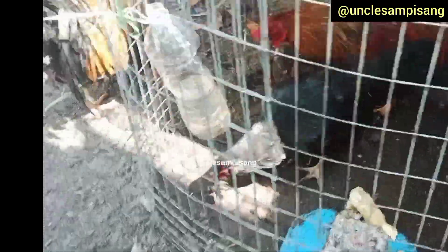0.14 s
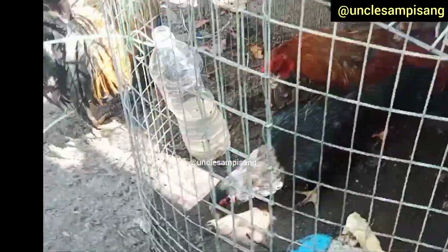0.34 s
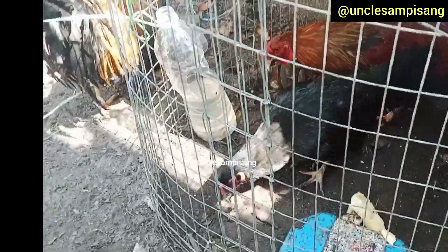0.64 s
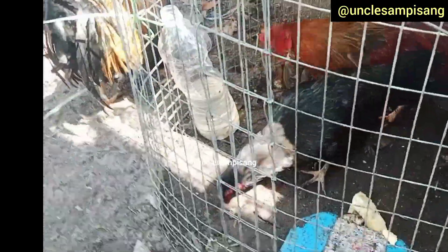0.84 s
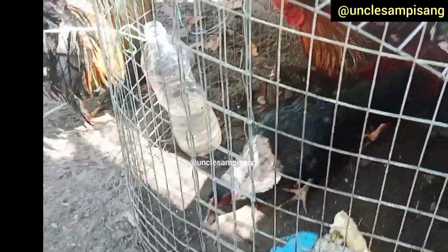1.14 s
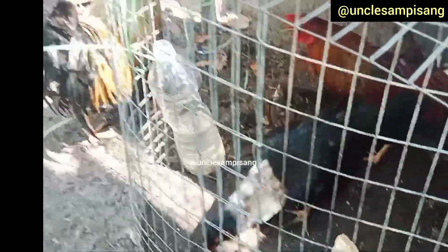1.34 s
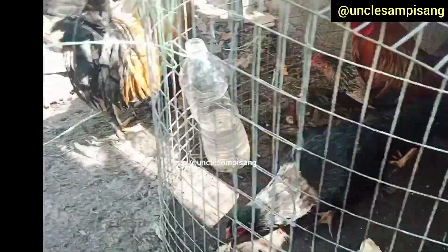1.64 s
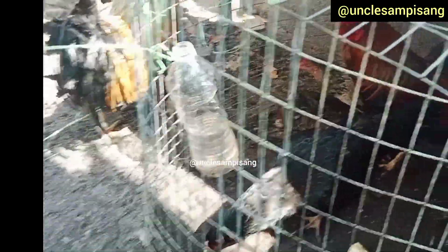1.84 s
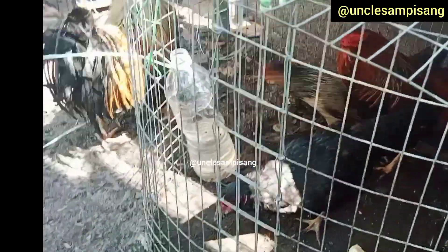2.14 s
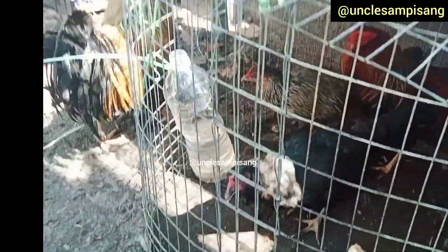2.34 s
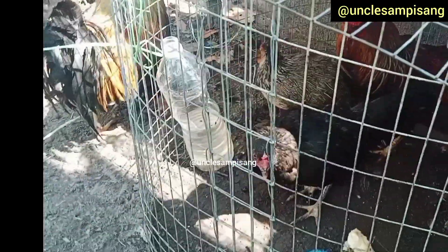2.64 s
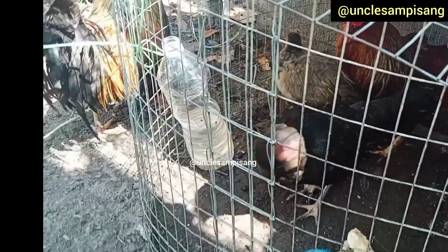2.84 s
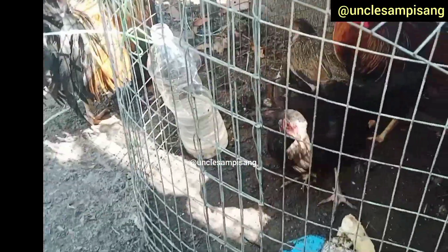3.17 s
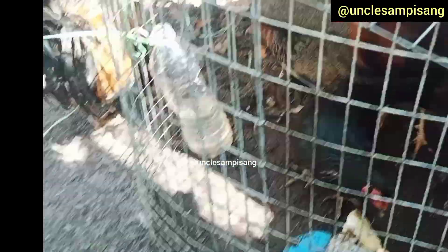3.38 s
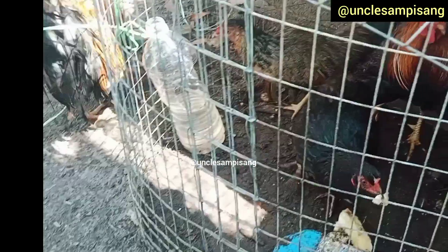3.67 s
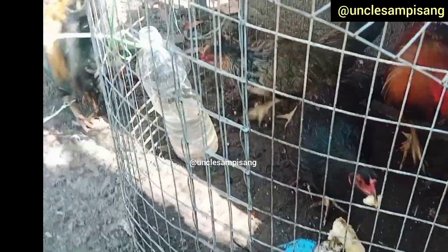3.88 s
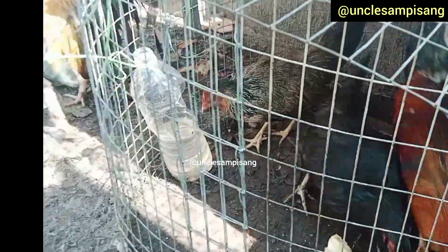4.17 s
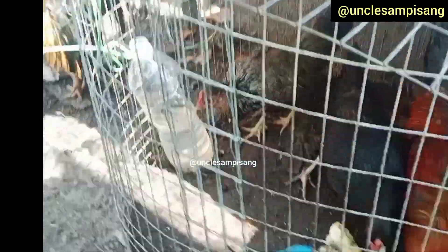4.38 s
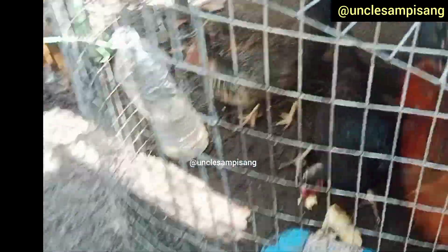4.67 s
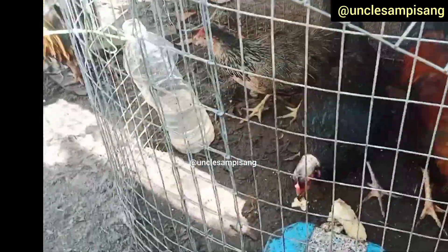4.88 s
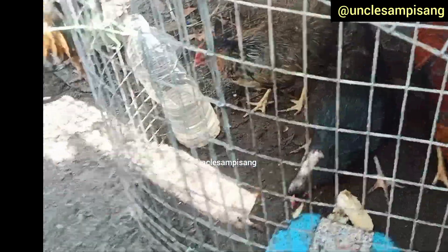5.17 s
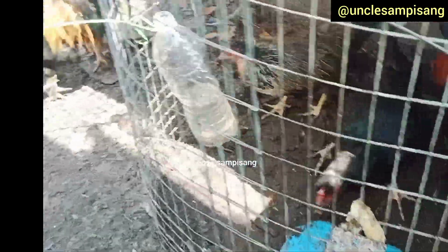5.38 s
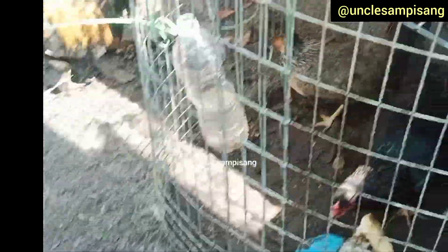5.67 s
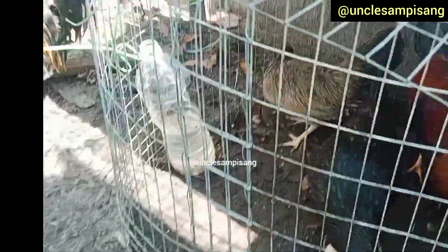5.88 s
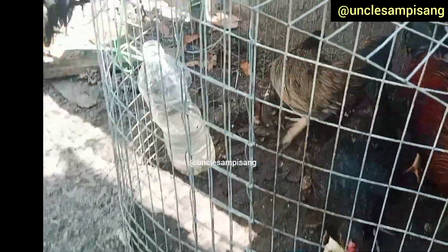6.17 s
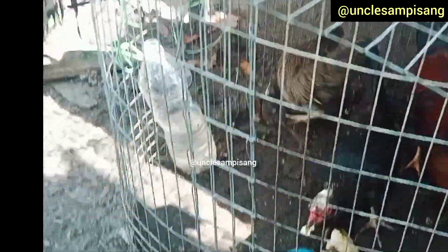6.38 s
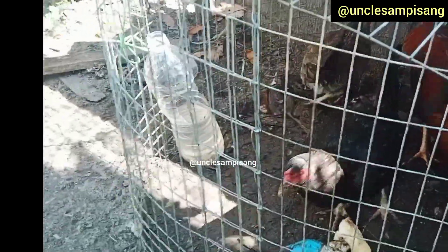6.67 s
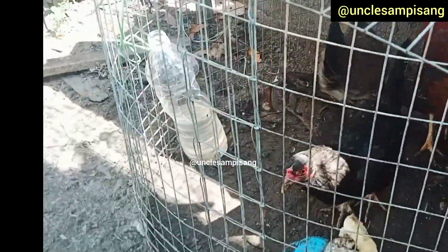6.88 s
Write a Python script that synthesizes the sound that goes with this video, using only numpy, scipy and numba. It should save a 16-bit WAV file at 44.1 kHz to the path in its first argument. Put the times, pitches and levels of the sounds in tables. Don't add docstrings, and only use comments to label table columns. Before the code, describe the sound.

In an outdoor wire pen, a rooster about a metre from a phone microphone gives short hoarse food clucks, each around a twentieth of a second, starting with a tiny closed hum and opening into a nasal, raspy burst pitched near 500 Hz. Three clucks come at 0.1 to 0.45 s, then a gap until 1.1 s. A run of about six per second follows, stronger from 2.1 s, fading to weak clucks at 3.2 and 3.4 s. After a pause, a second run starts at 3.9 s, slightly higher, louder from 5.4 s, and continues to the end at 7 s. Underneath are faint hen coos, a small knock with a murmur near 3.1 s, a crisp wire tick at 5.1 s, thin distant wheezes and barely audible leaf rustle. At 6.9 s a chick peeps sharply while feet scratch litter. Short yard echo, very low hush.

```python
import sys
import numpy as np
from scipy import signal
from scipy.fft import rfft, irfft, next_fast_len
from scipy.io import wavfile
from scipy.ndimage import uniform_filter1d
from numba import njit

SR = 44100
rng = np.random.default_rng(int(sys.argv[2]) if len(sys.argv) > 2 else 0)


def convert_level_to_amplitude(level_db):
    exponent = np.asarray(level_db, float) / 20
    return 10 ** exponent


def master_out(mix):
    frames = np.transpose(np.atleast_2d(mix))
    ceiling = np.clip(frames, -1, 1)
    pcm = np.round(ceiling * 32767).astype(np.int16)
    wavfile.write(sys.argv[1], SR, pcm)


N = 309582
TIME = np.arange(N) / SR


def unit(x):
    return x / np.sqrt(np.mean(x ** 2))


@njit
def svf(x, hz, width):
    y, band, low = np.empty(len(x)), 0., 0.
    for i in range(len(x)):
        g, k = np.tan(np.pi * hz[i] / SR), width / hz[i]
        v = (band + g * (x[i] - low)) / (1 + g * (g + k))
        band = 2 * v - band
        low += 2 * g * v
        y[i] = k * v
    return y


def modes(x, table):
    out = 0
    for k, (hz, width, db) in enumerate(table):
        out = out + (-1) ** k * convert_level_to_amplitude(db) * svf(x, np.full(len(x), 1. * hz), 1. * width)
    return out


def colour(x, table):
    hz, db = np.transpose(table)
    size = next_fast_len(len(x))
    bins = np.maximum(np.arange(size // 2 + 1) * SR / size, 1)
    gain = convert_level_to_amplitude(np.interp(np.log(bins), np.log(hz), db))
    return irfft(rfft(x, size) * gain, size)[:len(x)]


def walk(rate, size=N):
    k = int(SR / rate)
    held = np.repeat(rng.standard_normal(size // k + 1), k)
    return 1.3 * uniform_filter1d(uniform_filter1d(held, k), k)[:size]


def add(out, x, at_s):
    i = int(at_s * SR)
    out[i:i + len(x)] += x[:len(out) - i]


def rooster():
    # start_s, hum_ms, length_ms, level_db, beak_opening_db
    stooped = [(0.1, 12.3, 44.4, -22, -9.5), (0.251, 10.3, 40.4, -20, -5.5), (0.419, 14.4, 52, -21.5, -8),
               (1.086, 8.25, 43.2, -22, -6.5), (1.266, 10.3, 43.5, -22.5, -10.5),
               (1.433, 7, 39.5, -22, -9.5), (1.597, 6.85, 38, -21, -7.5), (1.746, 15.6, 47, -20, -10),
               (1.95, 14.9, 48.5, -21, -4.5), (2.115, 15, 46.7, -17, -11.5), (2.298, 12, 61, -17, -12.5),
               (2.49, 11.2, 51.6, -18.5, -11), (2.765, 14.3, 55.4, -17.5, -12.5),
               (2.921, 12.6, 55, -19, -12), (3.158, 7, 48, -27, -17), (3.386, 5.3, 36.6, -39, -21)]
    upright = [(3.904, 10, 46.4, -25.5, -15), (4.059, 10, 43.2, -18.5, -8.5), (4.222, 7, 44, -18.5, -8),
               (4.369, 18, 51, -18, -9.5), (4.524, 11, 50, -19.5, -5), (4.686, 12, 47.7, -19, -7.5),
               (4.878, 15, 56.7, -19.5, -5), (5.035, 13, 55.2, -19.5, -6.5), (5.254, 16, 61.4, -19.5, -7.5),
               (5.449, 12, 50.8, -16, -11), (5.683, 13, 43.5, -16.5, -13), (5.847, 15, 42.9, -17.5, -13),
               (6.013, 14, 54.2, -20.5, -14.5), (6.204, 20, 52.2, -18.5, -9), (6.475, 15, 48, -17, -13.5),
               (6.636, 10, 44, -17.5, -8), (6.8, 19, 48, -15.5, -9), (6.965, 17, 56, -18.5, -7.5)]
    # time_s, windpipe_hz, pitch_hz, mouth_ring_hz, throat_overtone_db
    neck = [(0.1, 926, 438, 2866, -0.5), (0.3, 912, 500.3, 2966, 1), (1.1, 834, 501.2, 2940, 4.5),
            (1.6, 874, 498.3, 2823, 2), (1.75, 840, 394, 2610, 4), (1.95, 852, 470.3, 2650, 3),
            (2.12, 831, 401.7, 2660, 2.5), (2.3, 908, 519, 2710, -1), (2.5, 868, 519.1, 2803, 1),
            (2.95, 884, 498.6, 2793, 4.5), (3.9, 848, 452.1, 2905, -5), (4.22, 980, 529.8, 2980, 1),
            (4.69, 990, 511.5, 2774, 2.5), (4.898, 980, 535.7, 3120, 0.5), (5.45, 986, 536.7, 2680, -0.5),
            (5.698, 1027, 508, 2820, -3.5), (6.302, 963, 529.3, 2637, -12.5), (7.0, 1002, 495.8, 2610, -13)]
    out = np.zeros(N)
    neck_s, *tunings = np.transpose(neck)
    for at_s, hum_ms, length_ms, level_db, beak_db in stooped + upright:
        tuning = [np.interp(at_s, neck_s, column) for column in tunings]
        add(out, cluck(hum_ms, length_ms, level_db, beak_db, *tuning), at_s)
    return out


def cluck(hum_ms, length_ms, level_db, beak_db, pipe_hz, pitch_hz, mouth_hz, throat_db, size=3500):
    # pitch_hz, width_hz, level_db
    beak_rings = [(1942, 810, -2.5), (3677, 680, -4), (4443, 770, -7)]
    # pitch_hz, width_hz, level_db
    chest_rings = [(310, 124, 0), (560.6, 121, 2), (823, 176, 0.5)]
    # pitch_hz, width_hz, level_db
    rasp_rings = [(5060, 210, -8.5), (6700, 460, 0.5), (8385, 1300, 2.5), (11000, 6600, -3),
                  (14500, 4800, -7.5)]
    mouth_rings = [(2287, 368, 3), (mouth_hz, 368, 1.47)]
    beak = []
    for hz, width, db in sorted(mouth_rings + beak_rings):
        beak.append((hz, width, db + .7 * rng.standard_normal()))
    throat = [(1.516 * pipe_hz, 290, 0)]

    ms = np.arange(size) / SR * 1000
    full_ms = hum_ms + 4
    loudest_ms, until_ms = .66 * length_ms, .89 * length_ms
    moments = [0, 3, hum_ms - 1.5, hum_ms, full_ms, loudest_ms, until_ms, length_ms, length_ms + 8]
    moments = np.maximum.accumulate(moments)
    effort_db = np.interp(ms, moments, [-38, -15, -12, -8, -2.5, .6, -2.5, -13, -45])
    effort_db = uniform_filter1d(effort_db, size=60)
    arch = np.interp(ms, [0, hum_ms, full_ms + 4, until_ms, length_ms], [.84, .9, .995, 1.0, .9])

    hoarse = np.clip(.2 + .11 * (-16 - level_db), .2, .6)
    noise = rng.standard_normal((2, size))
    phase = np.cumsum(pitch_hz * arch * (1 + .14 * hoarse * walk(260, size=size))) / SR
    cycle = phase % 1
    pulses = np.diff(np.exp(-cycle / 0.054), prepend=1)
    pulses = unit(pulses * convert_level_to_amplitude(5.0 * hoarse * walk(370, size=size)))
    source = pulses + 0.88 * hoarse * unit(noise[0] * np.exp(-cycle / .5))
    leak = unit(noise[1] * np.exp(-cycle / 0.87) * convert_level_to_amplitude(0.73 * walk(250, size=size)))

    sounding = slice(int(hum_ms * SR / 1000), int(length_ms * SR / 1000))
    pipe = pipe_hz * arch ** 0.71
    ring = svf(svf(source, pipe, 330.0), pipe, 330.0)
    ring = svf(np.tanh(0.59 * ring / np.std(ring[sounding])), pipe, 1100.0)
    layers = [ring]
    for rings, air in ((chest_rings, .3), (throat, .3), (beak, .4), (rasp_rings, 1.1)):
        layers.append(modes(modes(source + air * leak, rings), rings))

    closing_db = -4 * (ms - loudest_ms) / length_ms
    gains_db = [effort_db,
                -16 + effort_db,
                -4 + beak_db + throat_db + 1.9 * effort_db,
                beak_db + 1.33 * effort_db + 1.6 * closing_db,
                -16 + 1.346 * beak_db + 1.6 * effort_db + closing_db]
    out = sum(convert_level_to_amplitude(db) * x / np.std(x[sounding]) for db, x in zip(gains_db, layers))
    return convert_level_to_amplitude(level_db) * out


def note(table, wobble):
    s, hz, db, *over_db = np.transpose(table)
    pitch_hz = np.interp(TIME, s, hz) * (1 + wobble * walk(100))
    phase = 2 * np.pi * np.cumsum(pitch_hz) / SR
    overtone_db = np.interp(TIME, s, over_db[0]) if over_db else -26
    tone = np.sin(phase) + convert_level_to_amplitude(overtone_db) * np.sin(2 * phase)
    return np.sqrt(2) * tone * convert_level_to_amplitude(np.interp(TIME, s, db, -150, -150))


def hens():
    # time_s, pitch_hz, level_db, overtone_db
    coos = [
        [(.38, 548.6, -68, -21), (.42, 560, -52, -7.5), (.52, 541, -58, -14), (.58, 553, -49, -7),
         (.62, 569, -53.5, -19), (.65, 565, -72, -21)],
        [(3.165, 310, -52.5, -12.5), (3.19, 303, -37.5, -4), (3.25, 283.5, -71, -16), (3.3, 297, -74.5, -22)],
        [(3.064, 422, -63, -26), (3.072, 350, -32, -15), (3.083, 285, -46, 6.5), (3.095, 286, -84.5, 0)],
        [(5.517, 611, -55, -20), (5.525, 592, -41.5, -9.5), (5.535, 327, -41.5, 2.5), (5.548, 274, -50, -19.5)],
    ]
    return sum(note(coo, 0.014) for coo in coos)


def chick_peep():
    # time_s, pitch_hz, level_db
    peep = [(6.892, 3690, -79), (6.902, 4230, -46), (6.913, 4180, -41), (6.922, 5060, -28.5),
            (6.931, 6500, -33.5), (6.942, 6250, -29.5), (6.952, 5450, -26), (6.98, 4650, -37),
            (7.02, 4050, -47)]
    return note(peep, 0.012)


def ticks(size=6000):
    # start_s, peak_db, pitch_hz,
    # width_share (of pitch), t60_s (time to fall 60 dB)
    steps = [(0, -47.5, 910, 0.2, 0.14), (0, -61, 2700, 0.21, 0.38), (0.353, -46.5, 219, 1.2, 0.17),
             (.828, -54.5, 2000, 2, 0.033), (0.956, -56, 200, 1.1, 0.069), (3.066, -34, 1830, 0.28, 0.036),
             (3.348, -56.5, 2000, 0.38, 0.15), (3.467, -48, 1440, 0.97, 0.15),
             (3.729, -48, 576, 0.33, 0.026), (5.523, -47.5, 2520, 0.99, 0.067),
             (5.53, -44.5, 170, 0.45, 0.11), (5.882, -52.5, 229, 1.1, 0.095),
             (6.414, -60, 2530, 1.8, 0.056), (6.862, -40, 3070, 1.4, 0.036)]
    wire_ticks = [(.161, -45, 4640, 0.22, 0.036), (.312, -61, 13500, 0.37, 0.028),
                  (.347, -56, 12500, 0.54, 0.045), (0.554, -55, 13000, .5, 0.025),
                  (.725, -58, 13500, 0.54, 0.033), (1.405, -59, 10000, 1.5, 0.023),
                  (0.36, -45.5, 3600, 0.55, .04), (1.354, -45, 13000, 0.29, 0.042),
                  (1.222, -60.5, 14500, .3, .04), (1.392, -52, 15450, 0.3, .05),
                  (2.056, -64.5, 9470, 0.69, .03), (3.472, -45, 11000, 2.4, 0.067),
                  (4.131, -47.5, 9900, 1.2, 0.014), (4.614, -51.5, 11000, 0.84, 0.28),
                  (4.84, -57, 9930, 1.7, 0.049), (5.087, -29, 12000, 1.4, 0.044),
                  (6.577, -59, 14500, 0.55, 0.055)]
    out, t = np.zeros(N), np.arange(size) / SR
    for at_s, db, hz, share, t60 in steps + wire_ticks:
        ring = unit(svf(rng.standard_normal(size), np.full(size, 1. * hz), share * hz))
        fade = np.minimum(t / 0.0034, 1) * 1000. ** (-t / t60)
        add(out, convert_level_to_amplitude(db) * ring * fade, at_s)
    return out


def litter(curve, spectrum, lift_db, crackle_db):
    uneven_db = 2.1 * walk(120) + 3.8 * walk(25) + crackle_db * walk(60) ** 2
    grains = rng.standard_normal(N) * convert_level_to_amplitude(uneven_db)
    level_db = lift_db + np.interp(TIME, *np.transpose(curve), left=-150)
    return unit(colour(grains, spectrum)) * convert_level_to_amplitude(level_db)


def scratching():
    # time_s, level_db
    scratch = [(6.79, -101), (6.84, -54), (6.87, -48), (6.93, -34.5), (6.97, -39), (7.02, -37)]
    # pitch_hz, level_db
    litter_colour = [(60, -20), (130, -2.5), (300, -6), (700, -1), (2000, -9), (4500, -22), (8000, -13),
                     (12000, -13), (15500, -17)]
    return litter(scratch, litter_colour, 0, .2)


def rustling():
    # time_s, level_db
    rustle = [(0.0, -81), (0.7, -83), (1.1, -96.5), (1.29, -82), (1.5, -94.5), (3.0, -94), (3.5, -97.5),
              (4.24, -84), (4.9, -87.5), (5.2, -78), (5.5, -91), (5.92, -86), (6.8, -93.5), (7.02, -79)]
    # pitch_hz, level_db
    leaves = [(500, -13), (3000, -12.5), (6000, -3), (9000, -1.5), (12000, -0.5), (15500, -4.5)]
    return litter(rustle, leaves, 20, 1.1)


def wheeze(table):
    s, hz, db = np.transpose(table)
    t = np.arange(s[0], s[-1], 1 / SR)
    phase = 2 * np.pi * np.cumsum(np.interp(t, s, hz)) / SR
    orders = np.arange(int(4200 / hz.mean()), int(11600 / hz.mean()))[:, None]
    strength_db = 5.9 * rng.standard_normal(orders.shape) + 24 * orders / orders.max()
    voice = unit((convert_level_to_amplitude(strength_db) * np.sin(orders * phase)).sum(axis=0))
    out = np.zeros(N)
    add(out, voice * convert_level_to_amplitude(np.interp(t, s, db)), s[0])
    return out


def far_hens():
    # time_s, pitch_hz, level_db
    wheezes = [
        [(.93, 420, -96.5), (1, 430, -74), (1.12, 473, -75), (1.2, 482, -61), (1.3, 498, -81), (1.42, 463, -80)],
        [(3.07, 490, -75), (3.11, 482, -69), (3.25, 486, -75), (3.3, 468, -93)],
        [(4.98, 970, -82), (5.04, 1000, -74), (5.11, 1020, -77), (5.19, 1040, -66), (5.26, 1025, -74),
         (5.36, 980, -93)],
    ]
    return sum(wheeze(table) for table in wheezes)


@njit
def walls(x, lags, gain, damp):
    line, soft, out = np.zeros((8, 4096)), np.zeros(8), np.zeros(len(x))
    for i in range(len(x)):
        total = 0.
        for k in range(8):
            soft[k] += (1 - damp) * (gain[k] * line[k, (i - lags[k]) & 4095] - soft[k])
            total += soft[k]
            out[i] += soft[k] * (1 - 2 * (k % 2))
        for k in range(8):
            line[k, i & 4095] = x[i] + soft[k] - total / 4
    return out


def yard_echo(x):
    # pitch_hz, level_db
    yard = [(150, -14.5), (500, -15.5), (1000, -26), (2600, -15.5), (4500, -15.5), (9000, -14)]
    lags = np.array([487, 631, 797, 1013, 1289, 1597, 1951, 2411])
    return walls(colour(x, yard), lags, convert_level_to_amplitude(-60 * lags / SR / 0.31), 0.54)


def hush():
    # pitch_hz, level_db
    hush_colour = [(25, -7.5), (45, 4), (100, -11), (160, -12), (300, -9.5), (420, -19), (650, -18.5),
                   (1200, -21), (3000, -23.5), (6000, -35.5), (15500, -31.5)]
    out, swell = 0, walk(0.24)
    for hz in 40 * 2. ** np.arange(9):
        band = svf(rng.standard_normal(N), np.full(N, hz), hz) / np.sqrt(hz)
        out = out + convert_level_to_amplitude(1.4 * swell + 3.2 * walk(6.6)) * band
    tilted = [(hz, db + 3 * np.log2(hz)) for hz, db in hush_colour]
    return unit(colour(out, tilted)) * convert_level_to_amplitude(-61.5)


def scene():
    birds = rooster() + hens() + ticks()
    chick = chick_peep()
    echo = yard_echo(birds + convert_level_to_amplitude(11) * chick)
    ground = scratching() + rustling()
    return (birds + chick + ground + far_hens() + echo + hush())[None]


def roll_off(x):
    return signal.sosfilt(signal.butter(12, 15600, fs=SR, output="sos"), x)


def record(dry):
    # pitch_hz, level_db
    phone = [(40, -7), (100, 6), (4600, -0.5), (5000, -6.5), (5800, -9), (7300, -11.5), (8100, -4.5),
             (8750, -1.5), (9300, -6), (9800, -13), (12500, -19.5), (15500, -5.5)]
    rounded = np.tanh(1.46 * colour(dry[0], phone))
    top = signal.ellip(8, .2, 70, 15550, fs=SR, output="sos")
    mix = signal.sosfilt(top, rounded)[None] / 1.688
    return roll_off(mix)


dry = scene()
out = record(dry)
master_out(out)
```